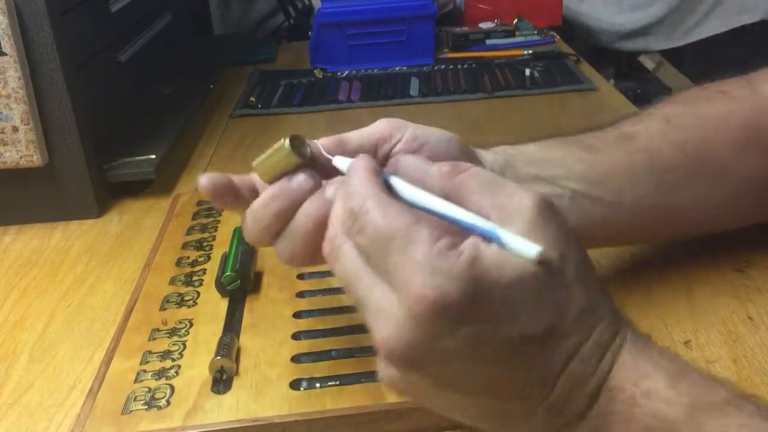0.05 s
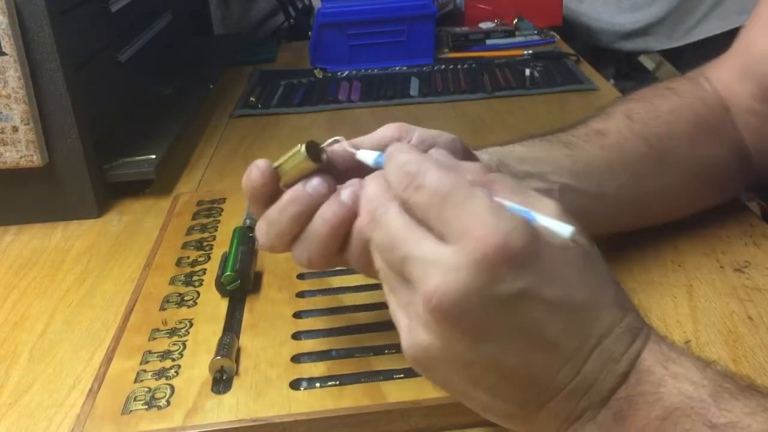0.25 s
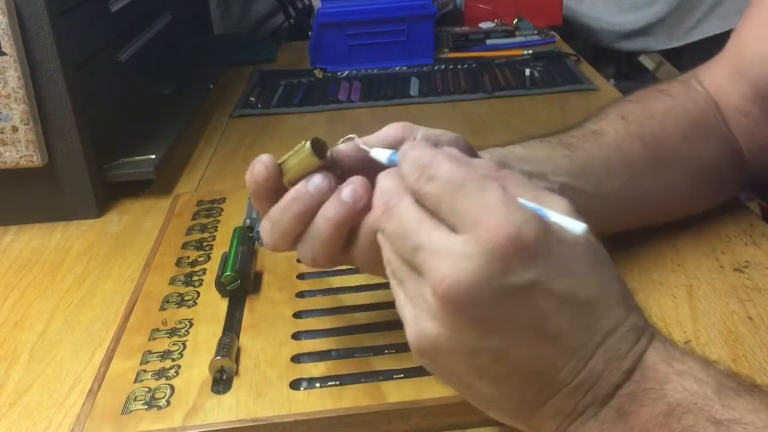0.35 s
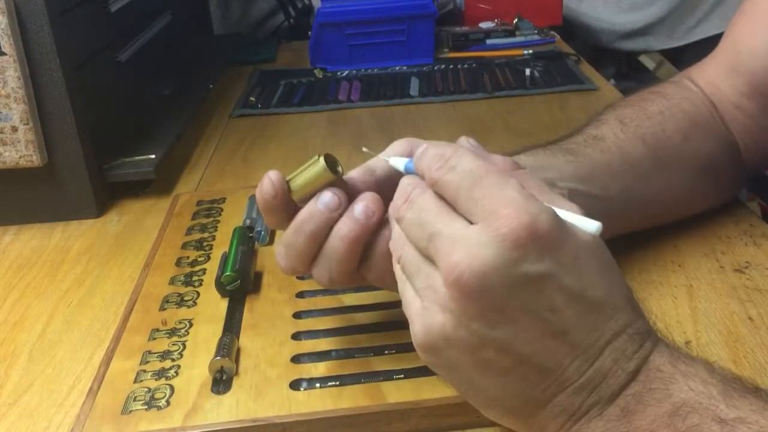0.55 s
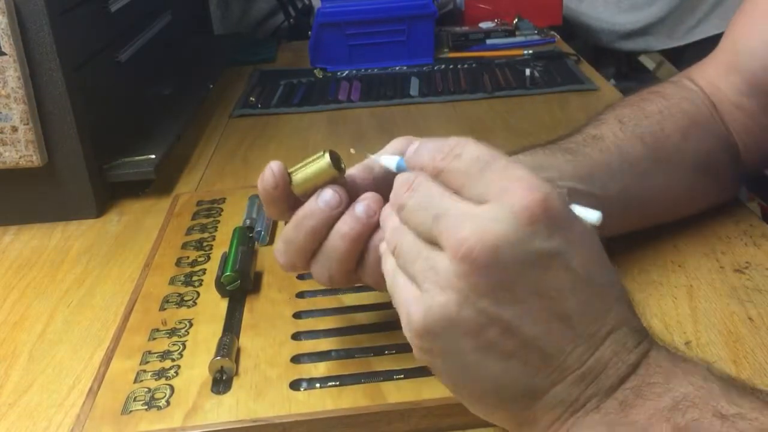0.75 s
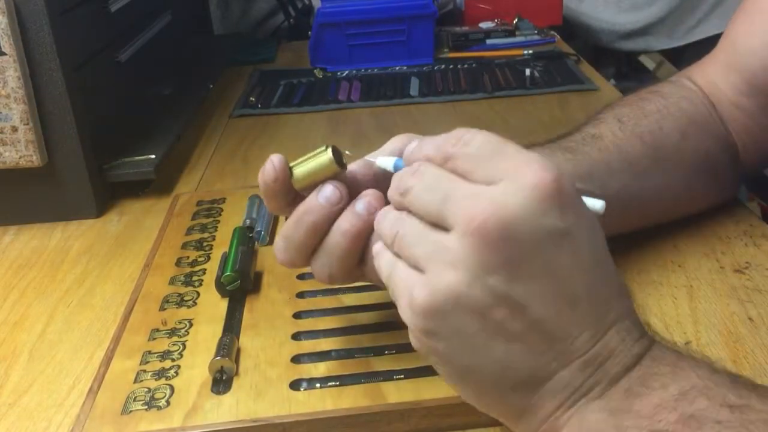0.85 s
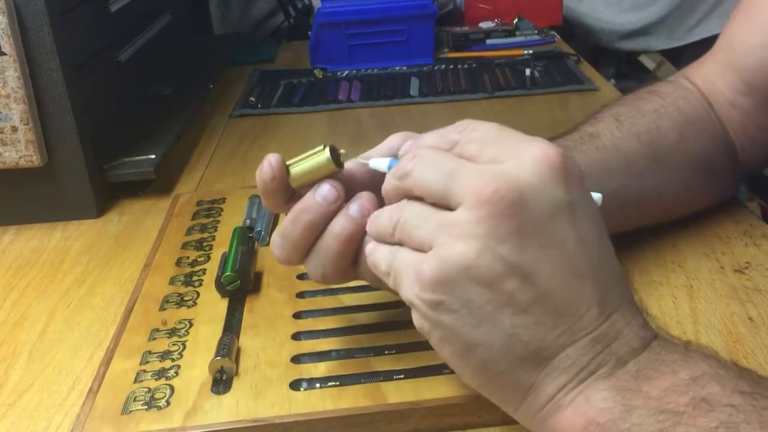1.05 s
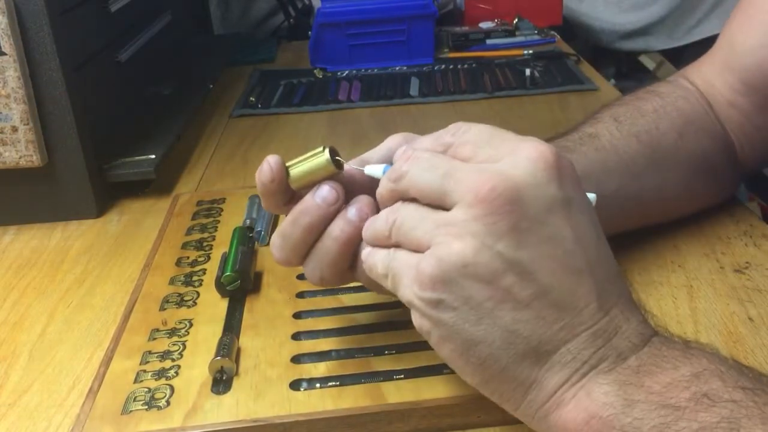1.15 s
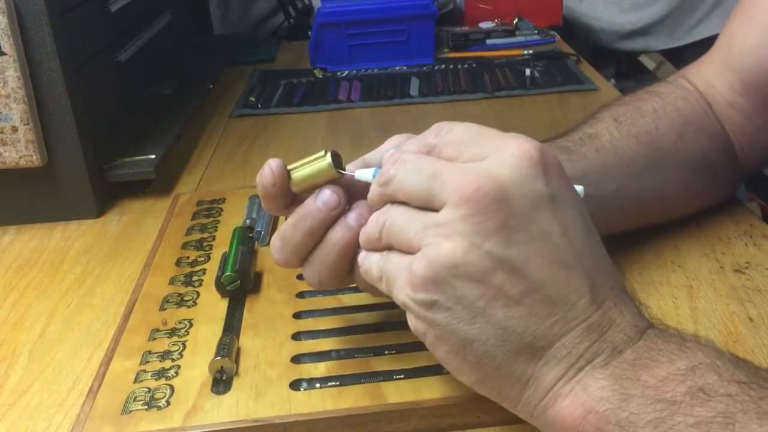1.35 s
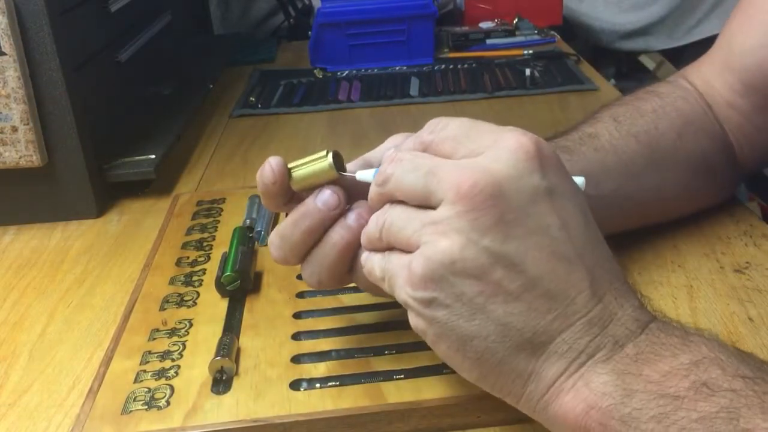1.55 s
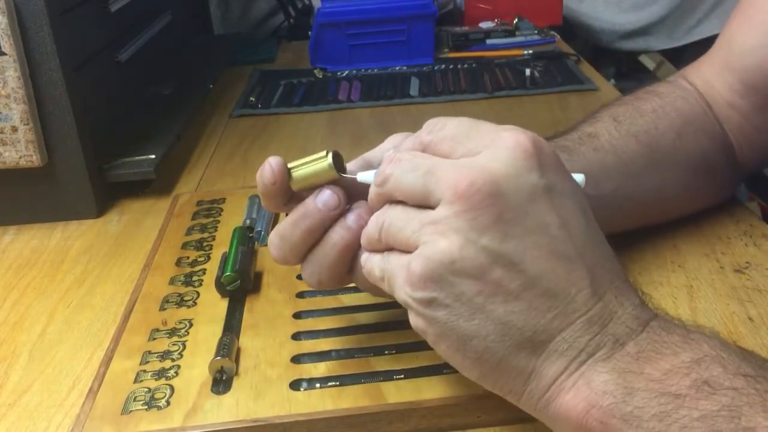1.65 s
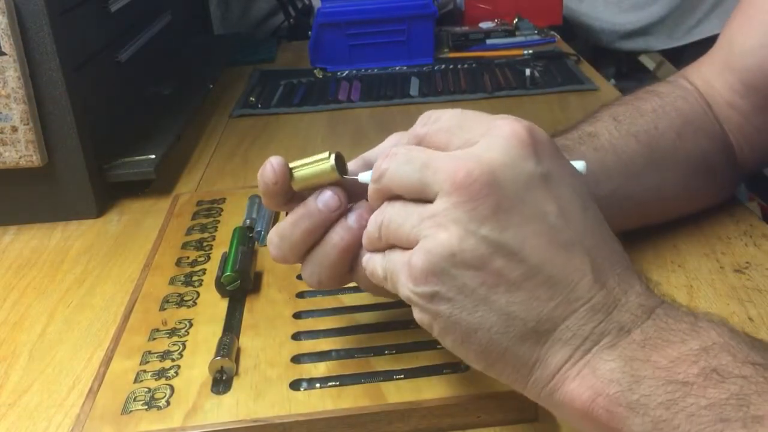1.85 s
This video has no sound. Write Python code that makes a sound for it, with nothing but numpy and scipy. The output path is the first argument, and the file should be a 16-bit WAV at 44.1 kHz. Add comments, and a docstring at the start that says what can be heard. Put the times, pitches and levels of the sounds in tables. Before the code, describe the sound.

A thin metal pick scrapes lightly inside a brass lock, close by, with a soft handling bump near 0.25 seconds. Among lighter taps, two sharp, bright clicks land at about 0.35 and 0.55 seconds, and a loose part rattles briefly to rest by 0.65. A small click follows near 0.9 seconds, then faint ticks and scraping until about 1.6, over a quiet room's hiss and low hum.

```python
"""A thin steel pick scrapes in a hand-held brass lock close to a camera, over a quiet room's hiss and hum.
Friction grains excite the lock's resonances from the start, and handling brings a soft bump and a swell
of rumble. Among lighter taps the pick knocks the body twice (0.34 s, 0.56 s), ringing its damped modes
and clicking brightly on the brass. A loose part then bounces to rest, and a few faint ticks follow.
Every impact leaves a short reverberation in the room."""
import sys
import numpy as np
from scipy import signal
from scipy.fft import rfft, irfft, next_fast_len
from scipy.io import wavfile
from scipy.ndimage import map_coordinates

SR = 44100
rng = np.random.default_rng(int(sys.argv[2]) if len(sys.argv) > 2 else 0)


def unload_audio(sound):
    """Save the sound as a 16-bit wav file, at the path given as the first command line argument."""
    columns = np.transpose(np.atleast_2d(sound))
    # keep every value between -1 and 1, then stretch to whole-number steps
    steps = np.round(np.clip(columns, -1, 1) * 32767)
    wavfile.write(sys.argv[1], SR, steps.astype(np.int16))


N = 83790
BAND_LIMIT_HZ = 15900


def amp(db):
    """Amplitude ratio of a level in decibels."""
    return 10 ** (np.asarray(db) / 20)


def unit(x):
    """Normalisation to rms 1."""
    return x / np.sqrt(np.mean(x ** 2) + 1e-20)


def along(points, hz):
    """Interpolation of (frequency_hz, value) points on a logarithmic frequency axis."""
    point_hz, values = np.transpose(points)
    return np.interp(np.log(hz + 1), np.log(point_hz + 1), values)


def curves(rows):
    """Linear envelopes: one value per sample for each column after the time."""
    time_s, *columns = np.transpose(rows)
    return [np.interp(np.arange(N) / SR, time_s, column) for column in columns]


def wobble(knots_per_s):
    """Slow random modulation: a spline through Gaussian knots."""
    return map_coordinates(rng.standard_normal(int(N * knots_per_s / SR) + 4),
                           [np.arange(N) * knots_per_s / SR])


def bell(hz, centre_hz, octaves, floor_db):
    """Gaussian band weighting in dB: 6 dB down at `octaves` from the centre, limited by a floor."""
    return np.maximum(-6 * (np.log2((hz + 1) / centre_hz) / octaves) ** 2, floor_db)


def filtered(x, response):
    """Linear filtering: the spectrum of x times a frequency response."""
    size = next_fast_len(N + SR // 2)
    return irfft(rfft(x, size) * response(np.fft.rfftfreq(size, 1 / SR)), size)[..., :N]


def coloured(spectrum):
    """Spectral shaping of white noise by (frequency_hz, density_db) points, at rms 1."""
    points = [(spectrum[0][0] / 2, -120)] + list(spectrum)
    return unit(filtered(rng.standard_normal(N), lambda hz: amp(along(points, hz))))


def resonant(x, peaks):
    """Parallel resonators (centre_hz, width_hz, gain_db) of alternating sign driven by x, at rms 1."""
    return unit(filtered(x, lambda hz: sum(
        (-1) ** k * amp(db) * 1j * hz * width / (centre ** 2 - hz ** 2 + 1j * hz * width)
        for k, (centre, width, db) in enumerate(peaks))))


def add(out, start_s, x):
    """Superposition of x on out from start_s."""
    part = out[round(start_s * SR):][:len(x)]
    part += x[:len(part)]


def background():
    """Filtered noise: steady hiss, with amplitude modulation making the rumble swell and the hums throb."""
    # room hiss: frequency_hz, density_db
    hiss_spectrum = [(88, -41), (150, -17), (240, -1.5), (414, -15), (448, -25.5), (475, -16), (1500, -22),
                     (2020, -22), (10200, -33), (15100, -34), (16000, -39)]
    # low rumble: frequency_hz, density_db
    rumble_spectrum = [(12, -66.5), (20, -42), (35, -16.5), (45, -8), (75, -6), (107, -5.5), (131, -4.5),
                       (146, -12), (200, -24), (260, -53.5), (440, -120)]
    # handling raises the rumble: time_s, gain_db
    rumble_lift = [(0, 5.5), (.2, -9), (.26, 16.5), (.42, 7), (.5, 5), (.6, 9), (.7, 0)]
    # narrow noise bands heard as hums: centre_hz, width_hz, level_db
    hum_bands = [(84, 10, -68.5), (99, 15, -62.5), (120.5, 12, -66.5)]
    hiss_db, rumble_db, swing_db = -70, -63.5, 3
    throb_hz, throb_depth, drift_rad = 16, .7, 1.5
    lift_db, = curves(rumble_lift)
    rumble = unit(amp(swing_db * wobble(15)) * coloured(rumble_spectrum + [(300, -81)]))
    throb_phase = 2 * np.pi * throb_hz * np.arange(N) / SR + drift_rad * wobble(4.7)
    throb = unit(1 + throb_depth * np.sin(throb_phase))
    hum = np.zeros(N)
    for hz, width, db in hum_bands:
        wide_band = resonant(rng.standard_normal(N), [(hz, 3 * width, 0)])
        hum += amp(db) * resonant(wide_band, [(hz, width, 0)])
    return amp(hiss_db) * coloured(hiss_spectrum) + amp(rumble_db + lift_db) * rumble + hum * throb


def scrape():
    """Friction: dense random impulses drive the body's resonances, along with low and treble noise."""
    # course of the scrape, the last three relative to level_db:
    # time_s, level_db, low_db, upper_db, treble_db
    strokes = [(0, -55.5, 0, -3.5, -15), (.068, -77.5, -9, -2.5, -4), (.12, -70.5, -7, -1.5, -1.5),
               (.14, -77.5, 19, -3, -5), (.163, -73, 2, 0, 2), (.172, -54, -1.5, -0.5, -2.5),
               (.215, -51, -2.5, -5.5, -10), (.26, -51, -3, -8, -15), (.335, -45.5, -0.5, -10, -13),
               (.365, -37, -5, -1.5, -11), (.384, -43, 2, -9.5, -15), (.492, -64.5, -13, -8, -13.5),
               (.515, -63.5, -10.5, -5, -3), (.524, -44.5, -10, 6, -15.5), (.543, -65, -9.5, 0, -9.5),
               (.556, -32, 5, -1, -0.5), (.576, -47.5, -4.5, 1, -11), (.628, -54, 6.5, 2, -13),
               (.65, -54, 7, -3, -13), (.688, -73, -3, -4, -22), (.812, -85, 8.5, -11.5, -9),
               (.818, -59.5, -8.5, -20, -27), (.85, -64, 7, -16, -16), (.89, -72.5, -12, -12, -11.5),
               (.93, -86.5, -8, -3.5, 0), (1.17, -88, 3, -1.5, -2), (1.25, -79.5, -7, 2, 0),
               (1.38, -75, -5.5, -9, -5), (1.5, -82.5, -1, -5.5, -11)]
    # low, middle and upper resonances of the lock: centre_hz, width_hz, gain_db
    low_peaks = [(290, 100, 1.5), (510, 95, 1.5)]
    middle_peaks = [(1200, 500, -8), (1910, 850, -1), (2430, 720, -4.5)]
    upper_peaks = [(2700, 83, 0.5), (3250, 350, -2), (4250, 600, -6.5)]
    # treble fizz: frequency_hz, density_db
    fizz_spectrum = [(4800, -8), (5800, 3.5), (6500, -7), (9000, -5), (12500, -12), (16000, -15.5)]
    grains_per_s, spread_db = 6000, 2
    level_db, low_db, upper_db, treble_db = curves(strokes)
    chance, polarity, size = rng.uniform(size=(3, N))
    strength = amp(-spread_db * np.log(size + .00033))
    grains = (chance < grains_per_s / SR) * np.sign(polarity - .5) * strength
    middle = resonant(resonant(grains, [(1780, 1500, 0)]), middle_peaks)
    upper = resonant(resonant(grains, [(3300, 2000, 0)]), upper_peaks)
    low = resonant(resonant(rng.standard_normal(N), [(454, 1310, 0)]), low_peaks)
    fizz = coloured(fizz_spectrum)
    return amp(level_db) * (middle + amp(upper_db) * upper + amp(low_db) * low + amp(treble_db) * fizz)


def knocks():
    """Impact excitation: each knock or bounce is a damped pulse that rings body modes near its pitch."""
    # dull contacts with the lock body: start_s, level_db, pitch_hz, t60_s
    contacts = [(.172, -46, 952, .015), (.2295, -38.5, 1020, 0.0046), (.190, -39, 1812, .012),
                (.2635, -32, 1685, 0.021), (.2935, -33, 1840, 0.036), (.310, -37, 1700, 0.0099),
                (.326, -36.5, 1850, 0.0083), (.334, -33.5, 1830, 0.015), (.3437, -13.5, 1780, 0.016),
                (.3444, -6, 1256, 0.0046), (.3475, -16.5, 970, 0.005), (.3530, -16, 1586, 0.011),
                (.3580, -21, 1070, 0.0099), (.3620, -23.5, 1488, 0.024), (.5475, -31, 2000, .01),
                (.5510, -21.5, 1404, 0.0095), (.5565, -11, 2484, 0.004), (.5590, -22, 1150, 0.0065),
                (.5640, -25.5, 2410, 0.0075), (.6395, -33.5, 2050, 0.026), (.6435, -29.5, 740, 0.004),
                (.817, -64, 1814, 0.018), (1.243, -53, 403, 0.031), (1.244, -54, 1178, 0.064),
                (1.245, -65, 3010, .015), (1.380, -60.5, 3360, 0.044)]
    # a loose part bouncing to rest: start_s, level_db
    bounces = [(0.5824, -21), (0.5955, -23.5), (0.6054, -28.5), (0.6118, -35), (.6190, -29.5),
               (0.623, -51.5), (.6280, -30.5), (0.6303, -38)]
    # modes of the lock body: frequency_hz, gain_db, t60_s
    body_modes = [(600, -7, 0.016), (865, 4.5, 0.052), (999, -6.5, .05), (1090, 2, 0.06),
                  (1218, -8.5, 0.032), (1445, -7.5, 0.025), (1793, -6.5, 0.1), (1940, -1, .045),
                  (2201, -6.5, 0.076), (2725, -8, 0.01)]
    partials = [(.48, -11), (1, 4), (1.6, -3.5), (2.6, -17)]  # pitch_ratio, gain_db
    bounce_hz, bounce_t60_s, ring_db = 890, .002, -16.5
    impacts = contacts + [(start_s, db, bounce_hz, bounce_t60_s) for start_s, db in bounces]
    out, t = np.zeros(N), np.arange(SR // 8) / SR
    for start_s, level_db, pitch_hz, t60_s in impacts:
        tone = sum(amp(db) * np.sin(2 * np.pi * pitch_hz * ratio * t) for ratio, db in partials)
        pulse = tone * amp(-60 * t / t60_s) * (1 - np.exp(-t * pitch_hz * 3))
        ring = sum(amp(db + bell(hz, pitch_hz, octaves=.6, floor_db=-39.5) - 60 * t / mode_t60_s)
                   * np.sin(2 * np.pi * hz * t) for hz, db, mode_t60_s in body_modes)
        add(out, start_s, -amp(level_db) * (pulse / np.abs(pulse).max() + amp(ring_db) * ring))
    return filtered(out, lambda hz: (1j * hz / (300 + 1j * hz)) ** 2)  # high-pass


def bump():
    """Damped oscillation: a few low tones with a gradual onset make one soft bump."""
    # tones of the bump: pitch_hz, level_db, t60_s
    tones = [(135, -31, .08), (195, -29.5, .05), (261, -23, 0.048)]
    start_s, attack_s = .2325, .002
    out, t = np.zeros(N), np.arange(SR // 5) / SR
    ring = sum(amp(db - 60 * t / t60_s) * np.sin(2 * np.pi * hz * t) for hz, db, t60_s in tones)
    add(out, start_s, ring * (1 - np.exp(-t / attack_s)))
    return filtered(out, lambda hz: (1j * hz / (80 + 1j * hz)) ** 2)  # high-pass


def clicks():
    """Modal ringing: each hard contact gives a noise crack and sounds the brass modes near its pitch."""
    # clicks of the pick on brass: start_s, crack_db, ring_db, pitch_hz, t60_s, crack_floor_db
    contacts = [(0.3437, -30, -31.5, 12000, 0.027, -9), (.3440, -43, -29.5, 4930, .02, 4),
                (.3620, -30, -34, 8870, 0.019, 6), (0.5206, -37.5, -31.5, 2800, .015, -11),
                (0.5191, -42.5, -44.5, 7280, 0.01, -12), (0.5216, -59, -52, 7950, 0.043, -3),
                (.5470, -23.5, -32, 12700, 0.012, -3), (.5560, -23, -25.5, 5356, .035, -10.5),
                (.5823, -33, -30.5, 5200, 0.014, -29), (0.5951, -44, -34.5, 5520, .02, -8),
                (0.6356, -38, -33, 3830, 0.024, -4), (.6357, -43, -37, 8070, 0.013, -24),
                (0.8901, -50, -47.5, 6410, 0.035, -21), (0.948, -69, -72, 6000, .04, -8),
                (1.066, -68, -80, 9050, 0.025, 4.5), (1.152, -58.5, -58, 5400, 0.063, 1),
                (1.334, -79, -65, 6900, 0.046, -13), (1.578, -66.5, -59, 14400, 0.028, -8)]
    # modes of the brass: frequency_hz, gain_db, longest_t60_s
    brass_modes = [(3300, -10.5, 0.01), (3834, -13.5, 0.035), (5510, -8, 0.12), (5656, -3.5, 0.013),
                   (6530, -4, 0.044), (7670, -6, 0.06), (8400, -4, .023), (9060, -10, .03),
                   (11520, -9, 0.01518), (12600, -11, .06)]
    scatter_db, attack_s = 1.4, .00024
    out, t = np.zeros(N), np.arange(SR // 6) / SR
    bin_hz = np.fft.rfftfreq(len(t), 1 / SR)
    for start_s, crack_db, ring_db, pitch_hz, t60_s, crack_floor_db in contacts:
        ring = np.zeros(len(t))
        for hz, db, longest_t60_s in brass_modes + [(pitch_hz, 0, .6 * t60_s)]:
            mode_db = db + rng.normal(0, scatter_db) + bell(hz, pitch_hz, octaves=.25, floor_db=-14)
            envelope = amp(mode_db - 60 * t / min(t60_s, longest_t60_s))
            ring += envelope * np.sin(2 * np.pi * hz * t + rng.uniform(0, 2 * np.pi))
        band = amp(bell(bin_hz, pitch_hz, octaves=.18, floor_db=crack_floor_db))
        low_cut = bin_hz > min(pitch_hz / 2, 3000)
        noise = unit(irfft(rfft(rng.standard_normal(len(t))) * band * low_cut, len(t)))
        crack = amp(crack_db - 60 * t / t60_s) * noise
        add(out, start_s, (amp(ring_db) * ring + crack) * (1 - np.exp(-t / attack_s)))
    return out


def room(x):
    """Reverberation: convolution with a noise tail whose high frequencies decay fastest."""
    # reverberation time of the room: frequency_hz, t60_s
    decay_times = [(200, .2), (2000, .15), (4000, .11), (10000, .08)]
    hz, t, spectra = signal.stft(rng.standard_normal(SR // 3), SR, nperseg=256)
    decay = amp(-60 * t / along(decay_times, hz)[:, None])
    tail = signal.istft(spectra * decay, SR, nperseg=256)[1]
    delayed = np.pad(x, (130, 0))  # about 3 ms
    return signal.fftconvolve(delayed, tail / np.linalg.norm(tail))[:N]


def scene():
    """Superposition: impacts, their reverberation and the scrape, top treble eased, over the background."""
    room_db, fall_db, fall_start_hz = -14.5, -10.5, 13100
    impacts = knocks() + clicks() + bump()
    lock = impacts + amp(room_db) * room(impacts) + scrape()
    lock = filtered(lock, lambda hz: amp(np.interp(hz, [fall_start_hz, BAND_LIMIT_HZ], [0, fall_db])))
    return (lock + background())[None]


def record(dry):
    """Low-pass filtering: the camera's response falls to zero across its band limit."""
    return filtered(dry, lambda hz: np.clip((BAND_LIMIT_HZ + 600 - hz) / 1200, 0, 1) ** 2)


dry = scene()
out = record(dry)
unload_audio(out)
```